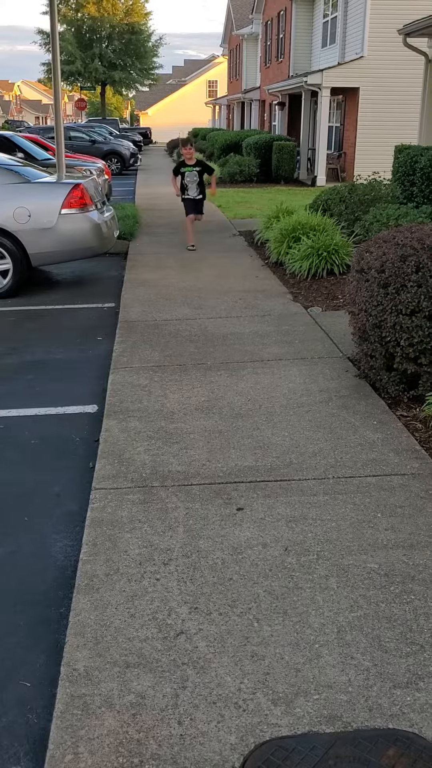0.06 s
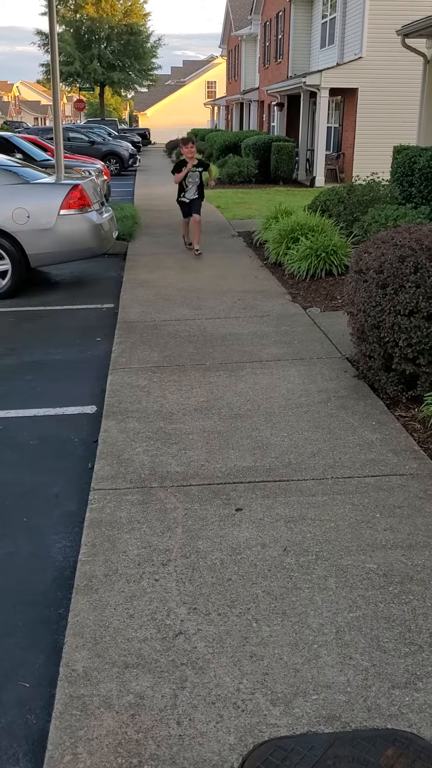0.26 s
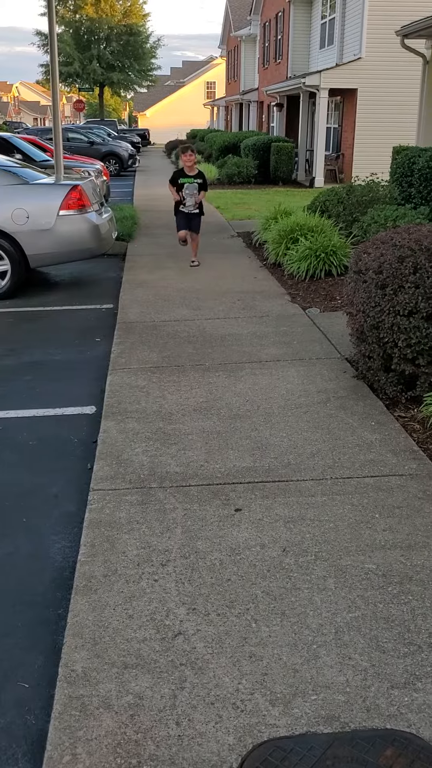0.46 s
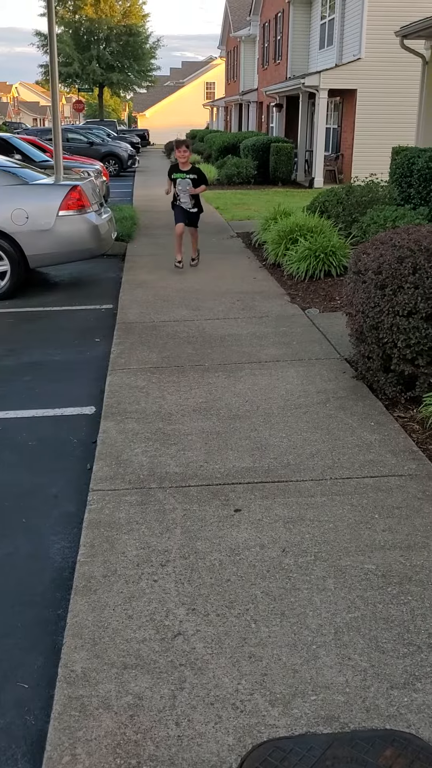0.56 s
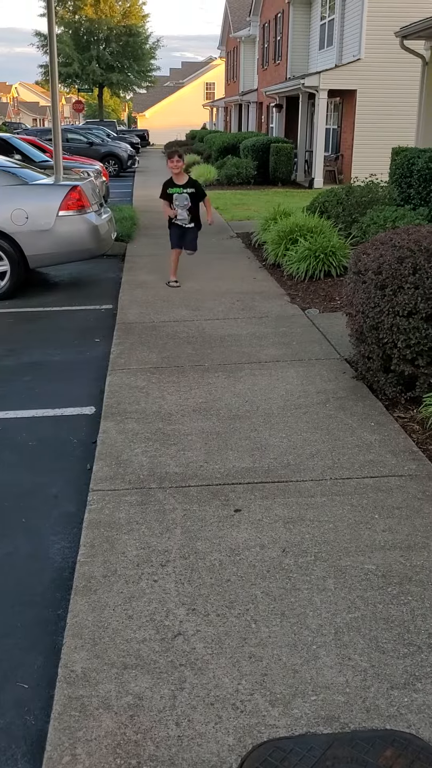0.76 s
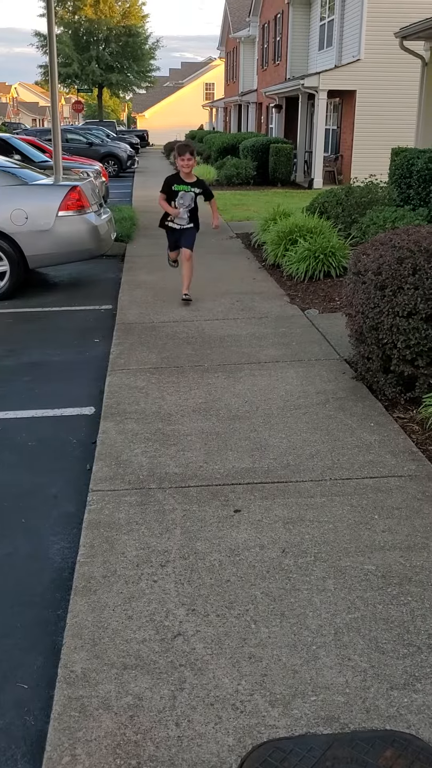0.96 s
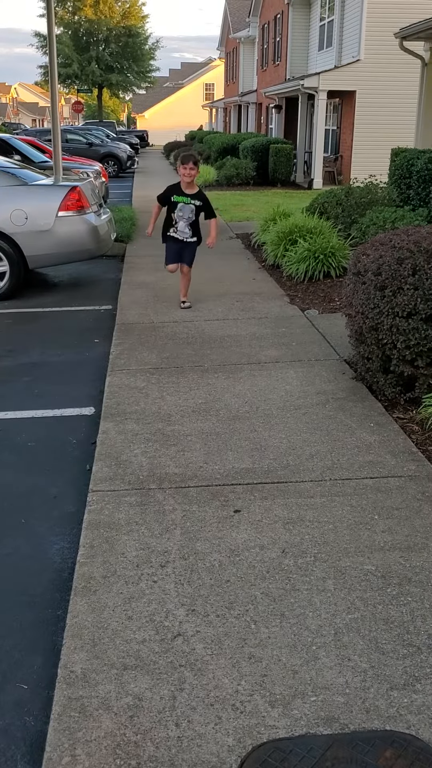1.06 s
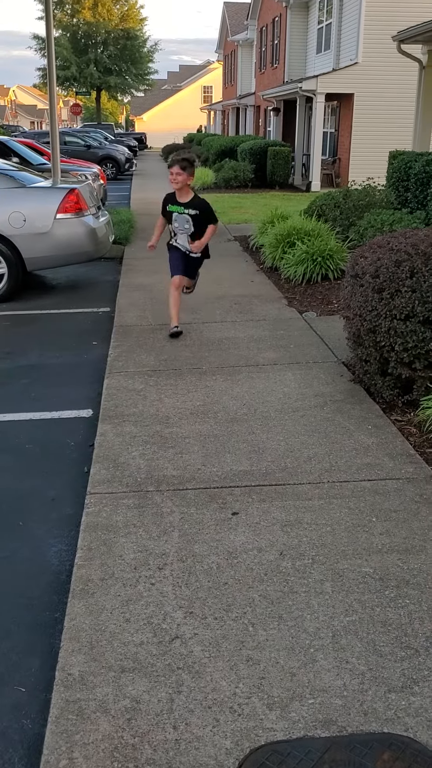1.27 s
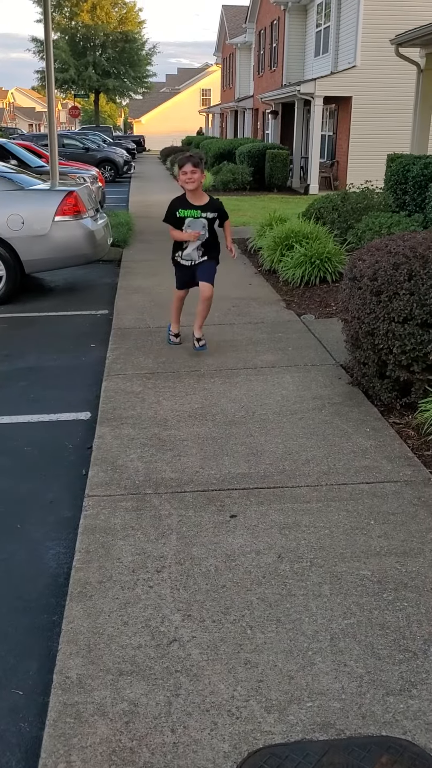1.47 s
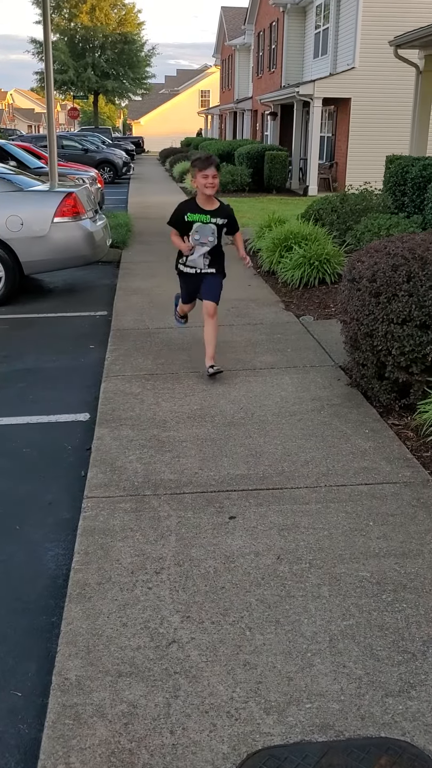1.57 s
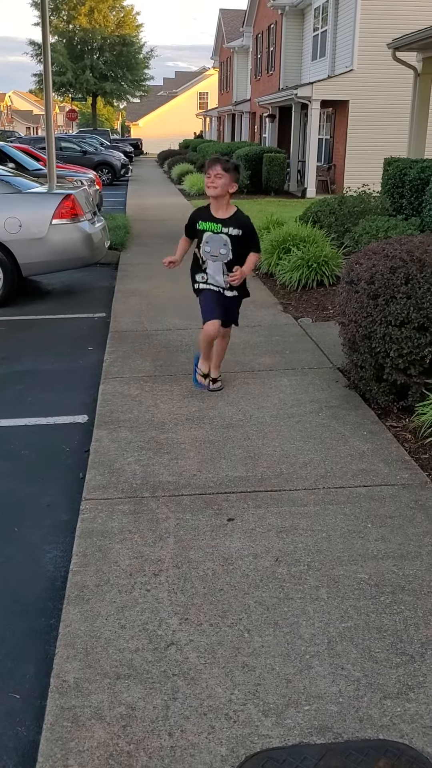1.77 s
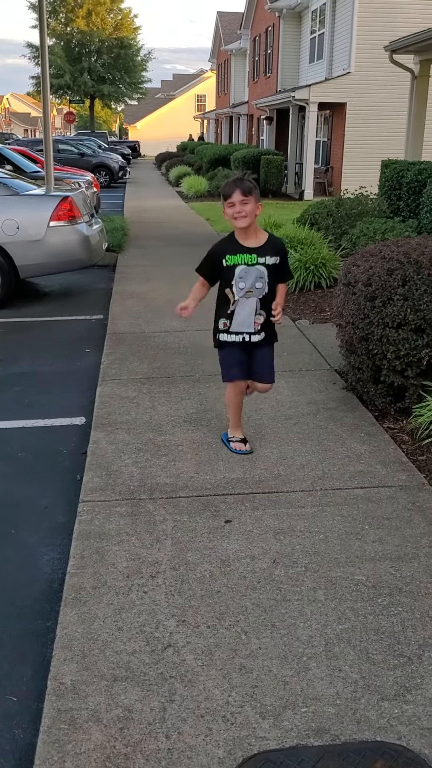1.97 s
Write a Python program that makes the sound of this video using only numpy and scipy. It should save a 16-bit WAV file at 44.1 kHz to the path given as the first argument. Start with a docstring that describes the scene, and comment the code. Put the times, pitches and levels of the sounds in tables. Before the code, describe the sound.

Flip-flops slap a concrete sidewalk at about three steps a second, at roughly 0.15, 0.45, 0.8, 1.1, 1.4, 1.7 and 2.0 seconds. Early slaps are faint, with a sandy skid at 0.45; the last three are clearly louder, sharp and rubbery. Light scuffs precede steps, house fronts echo briefly, and clothes swish from about 1.3. Low traffic rumble, motor hum and dull distant knocks lie behind.

```python
"""A child in flip-flops runs up a concrete sidewalk toward the listening point, about three steps a second.
Each step is light touches of the sole (damped sines, scraping noise), then a flat slap: a thud of air,
a short rubbery pop and a snap (damped modes), a crack and some grit (noise bursts); sand skids under one step.
House fronts echo the slaps (noise responses); a soft swish, likely of clothes, grows as he nears.
Behind him lie a low suburban rumble, traffic noise, motor hum and dull knocks down the street."""
import sys
import numpy as np
from scipy import signal
from scipy.fft import rfft, irfft, next_fast_len
from scipy.io import wavfile
from scipy.ndimage import map_coordinates

SR = 44100
rng = np.random.default_rng(int(sys.argv[2]) if len(sys.argv) > 2 else 0)


def unload_audio(sound):
    """Save the sound as a 16-bit wav file, at the path given as the first command line argument."""
    columns = np.transpose(np.atleast_2d(sound))
    # keep every value between -1 and 1, then stretch to whole-number steps
    steps = np.round(np.clip(columns, -1, 1) * 32767)
    wavfile.write(sys.argv[1], SR, steps.astype(np.int16))


N = 88729

# slaps: start_s, thud_lag_s, thud_db, thud_hz, pop_db (before halving), pop_hz, snap_db, snap_hz,
# crack_db, grit_db, street_echo_db
STEPS = [(0.1487, -0.0048, -36.5, 315, -32, 1620, -36, 2880, -40.5, -41, 3.5),
         (0.4534, 0.0065, -30.5, 230, -26.5, 1710, -32, 4420, -31, -33, 0),
         (.7790, .0004, -29.5, 400, -25.5, 1713, -28.5, 3650, -35.5, -50, 2),
         (1.0852, 0.0021, -32.5, 260, -34.5, 1650, -27, 3760, -40, -43, 1.5),
         (1.3670, .0005, -22.5, 335, -24, 1710, -20, 3620, -28.5, -43.5, -4.5),
         (1.6812, 0.0017, -18, 302, -9.5, 1777, -29, 3830, -22.5, -30.5, -5.5),
         (1.991, 0.0012, -15.5, 353, -39, 2070, -33, 3940, -30, -34.5, -1.5)]
# left-right likeness of the background: freq_hz, likeness (0..1)
BACKGROUND_ALIKE = [(50, 1), (200, .98), (400, 0.9), (800, 0.45), (1500, 0.6), (4000, 0)]
# left-right likeness of grit and sand: freq_hz, likeness (0..1)
GRIT_ALIKE = [(5000, 0.05)]


def amp(db):
    """Amplitude factor of a level in dB."""
    return 10 ** (np.asarray(db) / 20)


def unit(x):
    """x scaled to rms 1."""
    return x / np.sqrt(np.mean(x ** 2) + 1e-20)


def along(points, hz):
    """(Hz, value) points interpolated on a log frequency axis."""
    f, v = np.transpose(points)
    return np.interp(np.log(hz + 1), np.log(f + 1), v)


def since(start_s):
    """Seconds since start_s, for every sample."""
    return np.arange(N) / SR - start_s


def wobble(knots_per_s):
    """A smooth random curve through normal random knots."""
    return map_coordinates(rng.standard_normal(size=4096), [np.arange(N) * knots_per_s / SR], mode="mirror")


def filtered(x, response):
    """x times a zero-phase response of frequency."""
    m = next_fast_len(N + SR // 4)
    return irfft(rfft(x, m) * response(np.fft.rfftfreq(m, 1 / SR)), m)[..., :N]


def mid_side_gains(alike, hz):
    """Gains of independent mid and side noises that give a left-right likeness."""
    turn = np.arccos(np.clip(along(alike, hz), -1, 1)) / 2
    return np.array([np.cos(turn), np.sin(turn)])


def noise(spectrum, alike):
    """Stereo noise of rms 1 with a given colour and left-right likeness."""
    white = rng.standard_normal((2, N))
    mid, side = filtered(white, lambda hz: amp(along(spectrum, hz)) * mid_side_gains(alike, hz))
    return unit(np.array([mid + side, mid - side]))


def burst(t, rise_s, t60_s):
    """An envelope that swells up to t = 0 (e-fold rise_s), then falls 60 dB in t60_s."""
    return np.exp(np.minimum(t, 0) / rise_s) * amp(-60 * np.maximum(t, 0) / t60_s)


def ring(t, hz, rise_s, t60_s):
    """One quickly damped mode, peaking at t = 0."""
    return np.cos(2 * np.pi * hz * t) * burst(t, rise_s, t60_s)


def grainy(x, depth_db, grains_per_s):
    """Break a noise into tiny grains of random level; rms 1."""
    grain = np.interp(since(0) * grains_per_s, np.arange(N), rng.standard_normal(N))
    return unit(x * amp(depth_db * grain))


def background():
    """Distant rumble and traffic as coloured noise, motors as hum wavering in level and phase."""
    # start_s, rumble_db, traffic_db
    levels = [(0, -50, -56), (.3, -50.5, -53.5), (0.549, -48.5, -55), (0.751, -52.5, -55), (.95, -47, -52),
              (1.2, -52.5, -55), (1.6, -55.5, -53.5), (2.01, -50, -54)]
    # freq_hz, relative_db_per_hz
    rumble_colour = [(20, -52), (30, -48), (42, -7), (55, 3), (80, 1), (105, 0.5), (145, -8), (200, -11),
                     (260, -22.5), (400, -54.5)]
    traffic_colour = [(100, -3), (200, -1), (300, -1), (365, 4.5), (450, -4), (560, -6.5), (800, -8.5),
                      (1150, -11), (1600, -17.5), (2500, -31.5), (5000, -45), (10000, -54), (15000, -68)]
    # distant motors: freq_hz, rms_db
    motors = [(74.5, -58.5), (119.3, -57)]
    right_db = 0.76  # left goes down as much

    t = since(0)
    level_s, *levels_db = np.transpose(levels)
    rumble_db, traffic_db = (np.interp(t, level_s, level_db) for level_db in levels_db)
    rumble = amp(rumble_db) * noise(rumble_colour, BACKGROUND_ALIKE)
    traffic = amp(traffic_db + wobble(20)) * noise(traffic_colour, BACKGROUND_ALIKE)
    hum = 0
    for hz, db in motors:
        level = amp(db + 2.15 * wobble(7.76)) * np.sqrt(2)  # rms to peak
        hum = hum + level * np.sin(2 * np.pi * hz * t + 0.49 * wobble(6.95))
    return (rumble + traffic + hum) * amp([[-right_db], [right_db]])


def clothes():
    """A soft swish, likely of clothes: wide noise that swells and flutters in level."""
    # start_s, level_db
    swish = [(0, -68), (.12, -77), (.27, -68), (.40, -76.5), (.62, -69), (.73, -79), (0.879, -62.5),
             (1.05, -80), (1.14, -63.5), (1.34, -55.5), (1.41, -70), (1.501, -55.5), (1.65, -72),
             (1.72, -54), (1.84, -49.5), (1.95, -59), (2.01, -58.5)]
    # freq_hz, relative_db_per_hz
    colour = [(800, -3), (2000, -1.5), (3200, -1), (4800, -1.5), (6500, -1.5), (9300, 2.5), (11000, -7),
              (12500, -13.5), (15000, -4)]
    level_db = np.interp(since(0), *np.transpose(swish)) + 0.84 * wobble(44.9)
    return amp(level_db) * noise(colour, [(5000, 0.017)])


def touches():
    """The loose sole knocks, squeaks and scrapes on the pavement, mostly close to a slap."""
    # start_s, knock_db, knock_hz, squeak_db, squeak_hz, scrape_db, scrape_t60_s
    touch_table = [(.060, -41, 936, -50, 1290, -58.5, 0.012), (0.1439, -32, 345, -45, 2790, -40, 0.021),
                   (.420, -64, 450, -57, 4100, -48, 0.094), (0.4377, -40, 486, -45, 4430, -39.5, 0.084),
                   (0.4544, -31, 510, -49, 2470, -53, 0.018), (.768, -40, 404, -56, 3760, -43, 0.093),
                   (.773, -35, 258, -41.5, 1170, -48, 0.033), (.791, -35.5, 460, -44, 2250, -54, .02),
                   (1.0723, -30, 854, -40.5, 1590, -54, 0.017),
                   (1.339, -41.5, 800, -46.5, 4230, -49.5, 0.094), (1.35, -44, 405, -47, 4230, -42, 0.088),
                   (1.664, -40, 500, -45, 4000, -47.5, 0.12),
                   (1.6776, -26.5, 780, -27.5, 4210, -23.5, 0.0047),
                   (1.802, -34, 370, -56, 2200, -44.5, 0.071), (1.961, -37.5, 810, -44, 5280, -51, 0.071),
                   (1.9769, -33, 380, -36.5, 3500, -47, 0.079)]
    # freq_hz, relative_db_per_hz
    scrape_colour = [(300, 28), (1500, 14.5), (3500, 9), (6000, -3.5), (9500, -4), (12000, -9.5),
                     (15500, -48)]
    knock_t60_s, squeak_t60_s, scrape_rise_s = 0.02, 0.014, 0.0018

    scrape = grainy(noise(scrape_colour, [(5000, 0.71)]), depth_db=1, grains_per_s=1500)
    out = np.zeros((2, N))
    for start_s, knock_db, knock_hz, squeak_db, squeak_hz, scrape_db, scrape_t60_s in touch_table:
        t = since(start_s)
        knock = np.sin(2 * np.pi * knock_hz * np.maximum(t, 0)) * burst(t, scrape_rise_s, knock_t60_s)
        out -= amp(knock_db) * knock
        t = t - scrape_rise_s
        squeak = np.sin(2 * np.pi * squeak_hz * t + wobble(1200))  # rough phase
        out += amp(squeak_db) * squeak * burst(t, scrape_rise_s / 2, squeak_t60_s)
        out += amp(scrape_db) * scrape * burst(t, scrape_rise_s, scrape_t60_s)
    return out


def crackle(t, spectrum, alike, rise_s, t60_s):
    """A very short noise burst, its spectrum evened before colouring so that it has no pitch of its own."""
    size = 1024
    envelope = burst(t, rise_s, t60_s)
    start = int(np.argmax(envelope)) - 256
    window = np.pad(envelope, (0, size))[start:start + size]
    hz = np.fft.rfftfreq(size, 1 / SR)
    colour = amp(along(spectrum, hz)) * mid_side_gains(alike, hz)
    z = rfft(rng.standard_normal((2, size)) * window)
    mid, side = irfft(colour * z / abs(z)) * np.sqrt(window)
    pair = unit(np.array([mid + side, mid - side])) * np.sqrt(np.mean(window ** 2))
    return np.pad(pair, ((0, 0), (start, N)))[:, :N]


def slaps():
    """Each step's body (air push, pop, crack, grit) and the rubber's bright snap, which echoes less."""
    # modes of the sole: ratio_to_pop_hz, level_db
    sole = [(.45, -4), (1, 4), (1.36, -6), (1.62, -5.5)]
    # freq_hz, relative_db_per_hz
    crack_colour = [(150, -19), (620, -18), (950, 4), (1300, 5.5), (1700, 4), (2100, 1), (2500, 2),
                    (3300, 2), (4200, 1), (5000, -3), (9000, -13.5), (15000, -21.5)]
    grit_colour = [(500, 11), (2500, 8.5), (5000, -10), (7000, -9), (9500, -1), (12000, -14), (15500, -1)]
    # freq_hz, likeness (0..1)
    crack_alike = [(1000, 1), (4000, 0.18), (8000, 0.12)]
    # treble lost from the far end of the path: freq_hz, gain_db
    air = [(5000, -0.5), (10000, -3.5), (15000, -12)]
    thud_sigma_cycles = 0.43
    pop_rise_s, pop_t60_s = 0.000094, 0.0085
    mode_stagger_s = 0.00008  # each higher mode starts a little later
    snap_lag_s, snap_t60_s = 0.000403, 0.004  # the snap follows the pop
    crack_rise_s, crack_t60_s = 0.0015, 0.016
    grit_rise_s, grit_t60_s = 0.00072, 0.036
    arrival_s = 3.2  # when he would reach the listening point

    for (start_s, thud_lag_s, thud_db, thud_hz, pop_db, pop_hz, snap_db, snap_hz,
         crack_db, grit_db, _) in STEPS:
        t = since(start_s)
        cycles = thud_hz * (t - thud_lag_s)
        thud = np.cos(2 * np.pi * cycles) * np.exp(-(cycles / thud_sigma_cycles) ** 2 / 2)
        pop = 0
        for k, (ratio, mode_db) in enumerate(sole):
            pop = pop + amp(mode_db) * ring(t - k * mode_stagger_s, ratio * pop_hz, pop_rise_s, pop_t60_s)
        pop = pop / 2
        crack = crackle(t, crack_colour, crack_alike, crack_rise_s, crack_t60_s)
        grit = crackle(t, grit_colour, GRIT_ALIKE, grit_rise_s, grit_t60_s)
        body = amp(thud_db) * thud + amp(pop_db) * pop + amp(crack_db) * crack + amp(grit_db) * grit
        snap = amp(snap_db) * ring(t - snap_lag_s, snap_hz, pop_rise_s, snap_t60_s)
        distance = 1 - start_s / arrival_s  # share of the path left
        yield filtered(body, lambda hz: amp(along(air, hz) * distance)), snap


def reflection(delay_s, db, smear_s):
    """The response of one rough surface: a smeared copy after a delay."""
    t = since(delay_s)[:SR // 5]
    smear = rng.standard_normal((2, len(t))) * np.exp(-abs(t) / smear_s)
    smear = smear + 0.6 * smear.sum(0)  # partly shared by left and right
    return amp(db) * smear / np.linalg.norm(smear, axis=1, keepdims=True)


def walls(x, start_s):
    """The nearest house front answers first, later as he nears, then porches and parked cars."""
    # porches and cars: delay_s, level_db, smear_s
    porches = [(0.032, -16.5, .0012), (.043, -22.5, .004), (.125, -25.5, 0.013)]
    # reflections lose treble: freq_hz, gain_db
    wall_tone = [(150, -1), (1500, -0.5), (3500, 2.5), (6000, -14), (15000, -53)]
    wall_delay_s = 0.0093 + 0.00403 * start_s
    echoes = [(wall_delay_s, -11, 0.0007)] + porches
    response = sum(reflection(*surface) for surface in echoes)
    answer = signal.fftconvolve(x, response, axes=1)[:, :N]
    return filtered(answer, lambda hz: amp(along(wall_tone, hz)))


def street(x):
    """Quick, grainy scatter from cars and porches, then a faint long echo from the houses."""
    # freq_hz, relative_db
    echo_colour = [(100, -10), (300, -3), (800, 1.5), (1700, -2), (2300, -4), (3000, 6.5), (4200, 2),
                   (5200, 0.5), (9000, 7), (15000, 5)]
    # freq_hz, likeness (0..1)
    diffuse_alike = [(100, .98), (400, 0.89), (1000, 0.67), (2500, 0), (5000, 0.13), (15000, 0)]
    near_rise_s, near_t60_s, far_t60_s, far_db = 0.0083, 0.2, 1, -18.5

    t = since(0)
    decay = burst(t, 1, near_t60_s) + amp(far_db) * burst(t, 1, far_t60_s)
    fade = (1 - np.exp(-t / near_rise_s)) * decay
    scatter = grainy(noise(echo_colour, diffuse_alike), depth_db=3, grains_per_s=420)
    tail = scatter * fade / np.linalg.norm(fade)
    return signal.fftconvolve(x.mean(0)[None], tail, axes=1)[:, :N]


def far_knocks():
    """Dull little knocks somewhere down the street: short bursts of low noise."""
    # start_s, level_db
    knock_table = [(0.284, -48), (0.351, -46.5), (0.654, -48), (.862, -51), (1.567, -46.5)]
    # freq_hz, relative_db_per_hz
    colour = [(150, -18), (350, 2.5), (550, 4.5), (800, -10.5), (1500, -21), (4000, -36.5)]
    level = sum(amp(db) * burst(since(start_s), rise_s=0.0039, t60_s=0.069) for start_s, db in knock_table)
    return level * noise(colour, BACKGROUND_ALIKE)


def skids():
    """Sand hisses under the sliding sole: grainy noise in short bursts."""
    # start_s, level_db
    skid_table = [(0.421, -50), (0.4402, -37), (0.4545, -44)]
    # freq_hz, relative_db_per_hz
    colour = [(1500, -11), (4000, 7.5), (7000, -2), (10000, 5.5), (12500, -4), (15500, -5.5)]
    level = sum(amp(db) * burst(since(start_s), rise_s=0.0014, t60_s=0.018) for start_s, db in skid_table)
    return level * grainy(noise(colour, GRIT_ALIKE), depth_db=-1.0, grains_per_s=1200)


def runner():
    """All footfalls with their echoes, and the swishing clothes."""
    light_echo_db, snap_echo_db = -8.5, -8
    right_db = 1.3  # left goes down as much

    light = touches() + skids()
    out = light + amp(light_echo_db) * street(light)
    for (body, snap), (start_s, *_, street_echo_db) in zip(slaps(), STEPS):
        radiated = body + amp(snap_echo_db) * snap
        out += body + snap
        out += walls(radiated, start_s) + amp(street_echo_db) * street(radiated)
    out += clothes()
    return out * amp([[-right_db], [right_db]])


def scene():
    """The runner in the street."""
    return runner() + background() + far_knocks()


def record(dry):
    """Band limit: nothing passes above top_hz."""
    top_hz = 15900
    return filtered(dry, lambda hz: hz < top_hz)


dry = scene()
out = record(dry)
unload_audio(out)
```